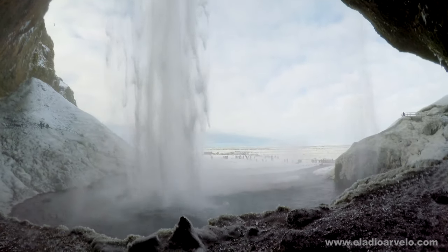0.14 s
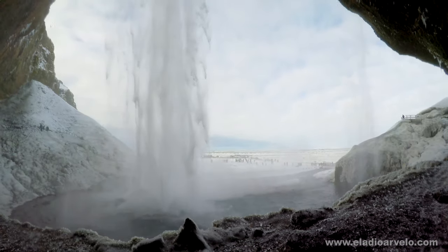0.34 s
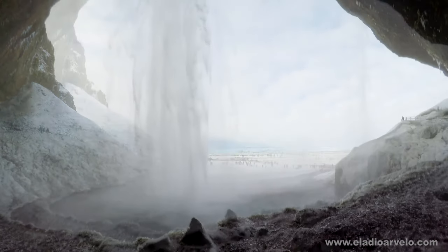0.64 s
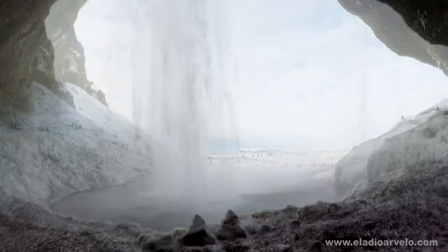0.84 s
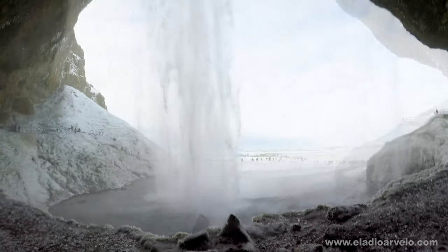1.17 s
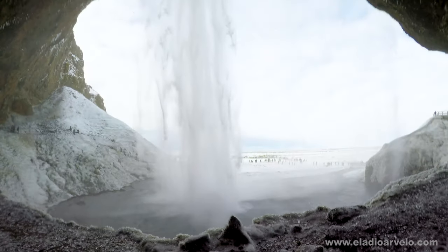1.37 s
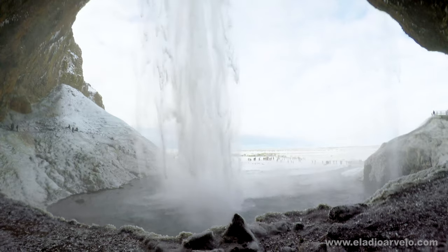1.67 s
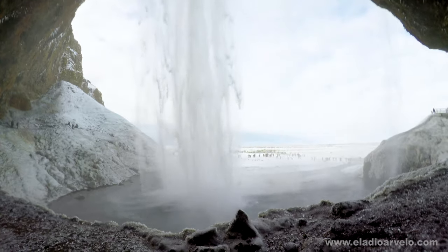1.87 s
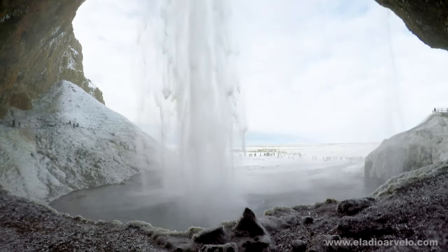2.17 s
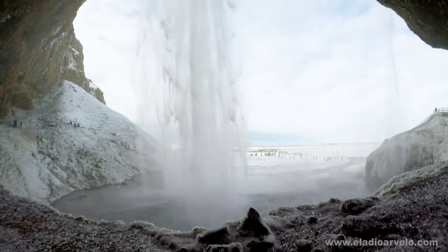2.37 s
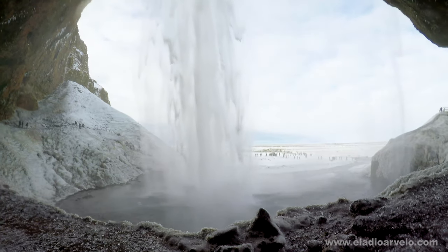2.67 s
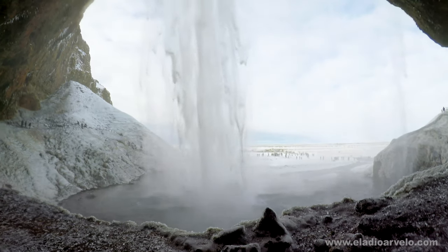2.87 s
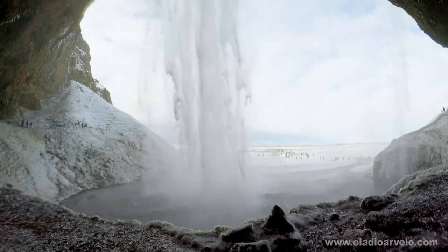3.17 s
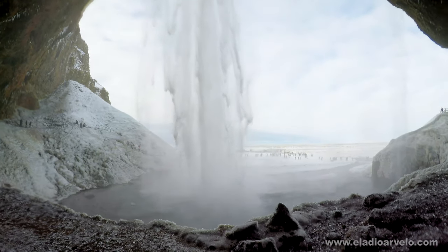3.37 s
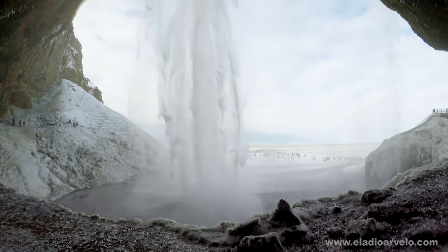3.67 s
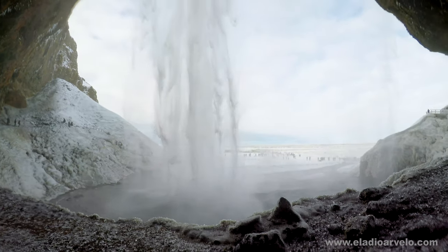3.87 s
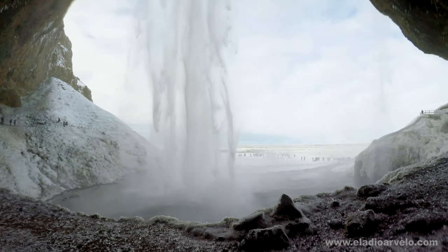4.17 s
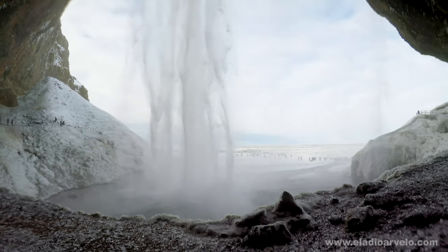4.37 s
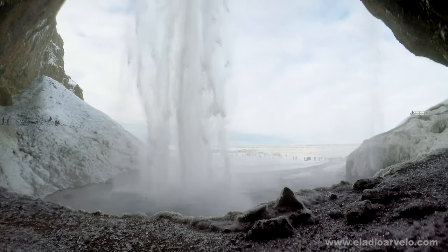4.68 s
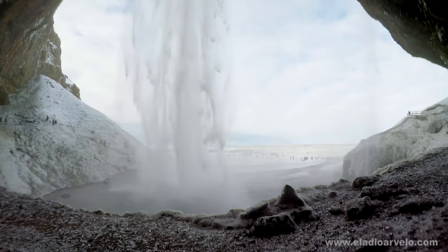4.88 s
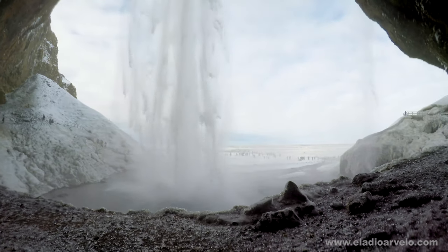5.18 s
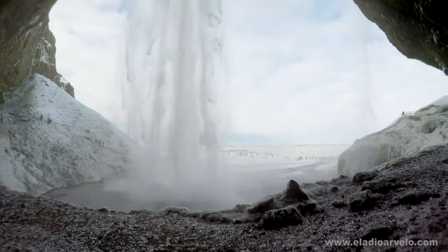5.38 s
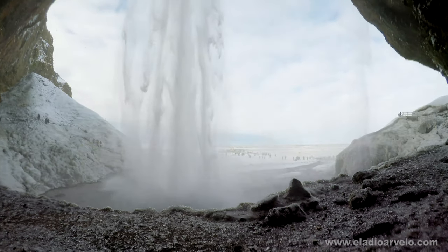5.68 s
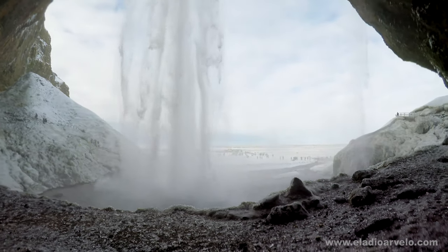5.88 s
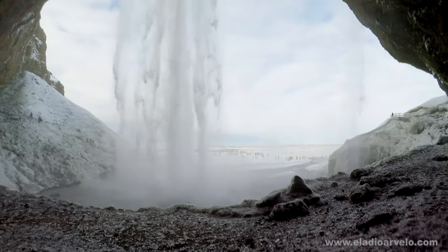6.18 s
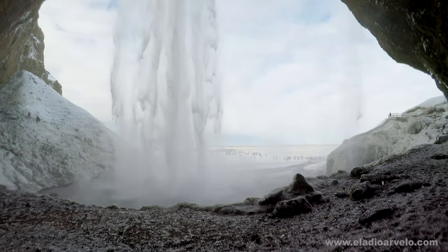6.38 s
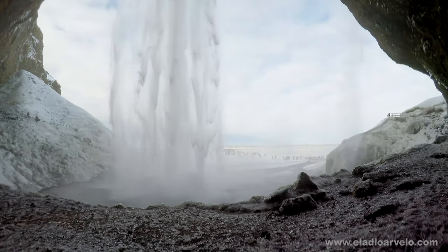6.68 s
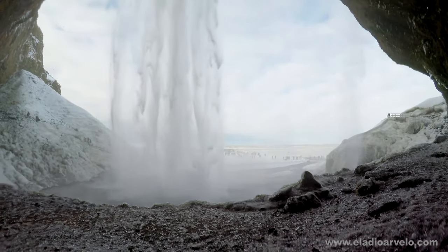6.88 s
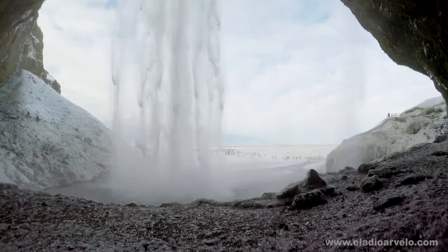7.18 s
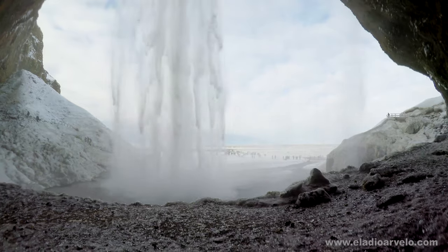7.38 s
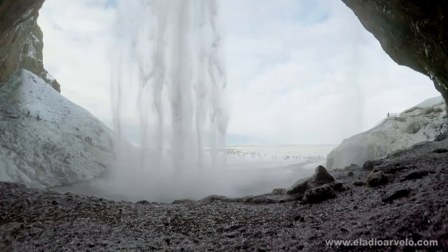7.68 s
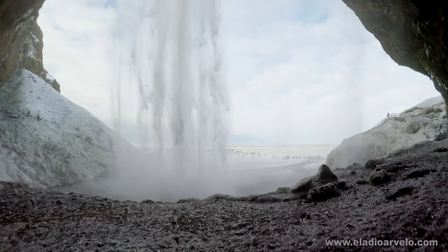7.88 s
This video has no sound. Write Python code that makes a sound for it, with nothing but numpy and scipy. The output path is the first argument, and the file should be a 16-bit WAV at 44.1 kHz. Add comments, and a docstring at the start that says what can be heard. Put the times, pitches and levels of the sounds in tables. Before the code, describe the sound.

Steady, powerful rush of falling water, already in full flow and cut off still running. Heavy bass rolls unevenly, with foamy low roar and muffled gurgling above it, little midrange, and a crisp wide hiss of drops and spray, slightly brighter at first. Short gulps and low booms thicken the rumble. Close single microphone inside a rocky hollow, with compressed bass.

```python
"""A tall waterfall plunges into a pool, heard for 8 s from the rock hollow behind it.
From the start, shaped noise gives the rumble, the hollow's resonant boom and the roar and gurgle of foam;
dense random impulses give the churn, splash, spray and mist, the spray brightest at first.
The rumble surges early, gulps of air follow, and a lump of water plops at about 0.9 s; louder booms
come from 2 s on. Throughout, the recorder holds the bass down with a fast compressor and cuts the top."""
import sys
import numpy as np
from scipy import signal
from scipy.fft import rfft, irfft
from scipy.io import wavfile
from scipy.ndimage import uniform_filter1d

SR = 44100
rng = np.random.default_rng(int(sys.argv[2]) if len(sys.argv) > 2 else 0)


def dump_mix(stems):
    """Bounce the given channels to the path in sys.argv[1] as a 16-bit WAV at rate SR."""
    frames = np.atleast_2d(stems).T  # one column per channel
    limited = np.clip(frames, -1, 1)  # hard clip at full scale
    pcm = np.round(limited * 32767).astype(np.int16)
    wavfile.write(sys.argv[1], SR, pcm)


N = 354563
TIME = np.arange(N) / SR
BINS_HZ = np.maximum(np.arange(N // 2 + 1) * SR / N, 1)   # kept above zero for the logarithm

# Level curves, before each source's gain and swells.
# weight of the falling column: [t/s, rumble level/dB]
COLUMN_WEIGHT = [(0, -15.5), (1.1, -16.5), (2.5, -16.5), (3.9, -17), (4.6, -15), (5.7, -20), (6.7, -16),
                 (8.04, -16.5)]
# how hard the hollow is driven: [t/s, boom level/dB]
HOLLOW_DRIVE = [(0.0, -23), (0.8, -19), (1.3, -27.5), (2.4, -18.5), (3.2, -22), (4.5, -26), (5.0, -23),
                (6.8, -22), (7.5, -17), (8.04, -19.5)]
# bubble clouds under the fall: [t/s, roar level/dB, gurgle level/dB, churn level/dB]
BUBBLE_CLOUDS = [(0.0, -24.0, -29.5, -40.5), (0.5, -21, -32.0, -43.5), (0.95, -21, -30.0, -41.5),
                 (1.8, -22, -30.5, -40.5), (2.5, -21, -31.5, -40.5), (4.0, -24.0, -32.5, -41.5),
                 (4.9, -22, -30.5, -42), (5.6, -23.5, -34.5, -43.0), (6.2, -24.5, -32.0, -43.5),
                 (6.7, -25, -31, -43.5), (7.7, -21, -30.5, -42.5), (8.04, -23, -32.5, -43.0)]
# how much water is thrown up from the pool: [t/s, level/dB]
THROWN_WATER = [(0.0, -26.5), (0.25, -26), (0.45, -29), (0.8, -27), (0.95, -26), (1.4, -27), (1.9, -27.5),
                (2.7, -26.5), (4.0, -27.5), (4.3, -26.5), (4.65, -26.5), (4.85, -28), (5.2, -27.5),
                (6.1, -28.0), (6.95, -27), (8.04, -28.5)]

# Spectral densities; only the shape counts, since each layer is scaled to rms 1.
# deep rumble of the plunge: [f/Hz, level/dB per Hz]
RUMBLE_SPECTRUM = [(4, -5.5), (9, -3.5), (17, -0.5), (33, -2), (43, 0), (55, 2), (72, -5), (90, -11),
                   (125, -25)]
# roar of big bubble clouds: [f/Hz, level/dB per Hz]
ROAR_SPECTRUM = [(70, -10), (105, -3.5), (140, 1.5), (172, -4.5), (215, -1), (238, -8), (265, -14),
                 (400, -57)]
# gurgle of smaller bubble clouds: [f/Hz, level/dB per Hz]
GURGLE_SPECTRUM = [(200, -20), (255, -0.5), (315, 1), (360, -6.5), (410, -6.5), (445, -13.5), (495, -14),
                   (545, -28.5), (700, -48)]
# churn of single bubbles: [f/Hz, level/dB per Hz]
CHURN_SPECTRUM = [(450, -17), (590, -15), (625, -4.5), (690, -3.5), (745, 1.5), (865, 0.5), (900, 0.5),
                  (965, -1.5), (1005, -7.5), (1065, -5.5), (1105, -18), (1300, -16)]
# drops splashing on the pool: [f/Hz, level/dB per Hz]
SPLASH_SPECTRUM = [(1000, -43), (1145, -16.5), (1190, -10.5), (1245, -8), (1300, -5), (1490, -1),
                   (1850, -3), (2250, -3), (3200, -5), (4200, -9.5), (7000, -17.5), (10000, -45)]
# hiss of blown spray: [f/Hz, level/dB per Hz]
SPRAY_SPECTRUM = [(1500, -31), (2900, -15), (3900, -0.5), (5200, -0.5), (6200, -1.6), (6900, -4),
                  (7700, -11), (8450, -11), (9150, -21.5), (10600, -40)]
# fizz of the finest mist: [f/Hz, level/dB per Hz]
MIST_SPECTRUM = [(7500, -17), (9400, 2), (10600, -1), (11500, -2), (12300, 1.5), (15100, -6)]

# Single events.
# heavier masses of water come down and the rumble surges: [t/s, rise in level/dB]
RUMBLE_SURGES = [(.36, 8.5), (1.76, 0), (3.3, 0), (4.39, 3), (4.76, 5), (5.25, 5), (7.9, 5)]
# big gulps of air go under and the foam swells: [t/s, rise in level/dB]
AIR_GULPS = [(.89, 4), (1.44, 0), (1.88, 5), (2.32, 5), (3.38, 3), (4.72, 5.5)]
# heavy lumps of water landing: [t/s, peak level/dB]
WATER_LUMPS = [(0.905, -22.5)]
# the hollow swells into a louder boom: [t/s, rise in level/dB]
HOLLOW_BOOMS = [(2.06, 11.5), (6.4, 9), (7.01, 10)]

# half-length of a swell, from its peak to 1/e of its rise in dB
SURGE_HALF_S, GULP_HALF_S, BOOM_HALF_S = 0.08, 0.028, 0.043
HOLLOW_HZ, HOLLOW_HALF_WIDTH_HZ = 89.1, 8
CHURN_SHARE = 0.33   # share of a gulp's rise in dB that reaches the churn
SPRAY_EXTRA_DB, SPRAY_SETTLE_S = 2.5, 1.5   # initial excess of spray and its time constant
CUTOFF_HZ = 15250


def from_db(db):
    """Logarithmic level: 20 dB is a tenfold amplitude."""
    return 10 ** (np.asarray(db) / 20)


def rms_one(x):
    """Normalization: scale a signal to rms 1."""
    return x / np.sqrt(np.mean(x ** 2) + 1e-20)


def in_time(rows):
    """Linear interpolation: each column of a curve, sample by sample."""
    s, *columns = np.transpose(rows)
    return [np.interp(TIME, s, column) for column in columns]


def coloured(x, spectrum):
    """Spectral shaping: a flat excitation is filtered to a spectrum, then scaled to rms 1."""
    hz, db = np.transpose(spectrum)
    # straight lines over log frequency; the level below the first point is held
    level_db = np.interp(np.log(BINS_HZ), np.log(hz), db, right=-120)
    return rms_one(irfft(rfft(x) * from_db(level_db), N))


def drift(rate_hz):
    """Random fluctuation: low-passed noise of rms 1."""
    lowpass = 1 / (1 + (BINS_HZ / rate_hz) ** 2)
    return rms_one(irfft(rfft(rng.standard_normal(N)) * lowpass, N))


def power(x, span_s):
    """Short-time power: the squared signal averaged under a triangular window."""
    size = max(int(span_s * SR), 2)
    once = uniform_filter1d(x ** 2, size)
    return np.maximum(uniform_filter1d(once, size), 1e-12)


def steady(x, span_s):
    """Envelope normalization: an even flow is noise with its slow swells levelled out."""
    return x / np.sqrt(power(x, span_s))


def impacts(per_s, spread_db):
    """Poisson-like arrivals: drops of uneven size land at random, so densely that they merge."""
    landed = rng.random(N) < per_s / SR
    size = from_db(spread_db * rng.standard_normal(N))
    return landed * rng.standard_normal(N) * size


def swells(rows, half_s):
    """Gaussian envelope: each event lifts the level by a bell-shaped swell, in dB."""
    return sum(rise_db * np.exp(-((TIME - s) / half_s) ** 2) for s, rise_db in rows)


def plunge(gain_db, roll_db, roll_hz):
    """Turbulent noise: the column's weight heaves the pool, a deep rumble that rolls and surges."""
    weight_db, = in_time(COLUMN_WEIGHT)
    roll = roll_db * drift(roll_hz)
    surge_db = swells(RUMBLE_SURGES, SURGE_HALF_S)
    rumble = steady(coloured(rng.standard_normal(N), RUMBLE_SPECTRUM), span_s=0.18)
    return from_db(weight_db + gain_db + roll + surge_db) * rumble


def hollow(gain_db):
    """Cavity resonance: turbulence keeps one low resonance of the rock hollow booming."""
    drive_db, = in_time(HOLLOW_DRIVE)
    edges = [HOLLOW_HZ - HOLLOW_HALF_WIDTH_HZ, HOLLOW_HZ + HOLLOW_HALF_WIDTH_HZ]
    band = signal.butter(2, edges, "band", fs=SR, output="sos")
    boom = signal.sosfilt(band, rng.standard_normal(N + SR))[SR:]   # one second to build up
    rise_db = swells(HOLLOW_BOOMS, BOOM_HALF_S)
    return from_db(drive_db + rise_db + gain_db) * steady(boom, span_s=0.13)


def foam(roar_gain_db, gurgle_gain_db, churn_gain_db):
    """Bubble radiation: submerged air roars in big clouds, gurgles in smaller ones, churns singly."""
    roar_db, gurgle_db, churn_db = in_time(BUBBLE_CLOUDS)
    gulp_db = swells(AIR_GULPS, GULP_HALF_S)
    roar = steady(coloured(rng.standard_normal(N), ROAR_SPECTRUM), span_s=0.3)
    gurgle = steady(coloured(rng.standard_normal(N), GURGLE_SPECTRUM), span_s=0.5)
    churn = steady(coloured(impacts(per_s=9000, spread_db=1.5), CHURN_SPECTRUM), span_s=0.54)
    return (from_db(roar_db + roar_gain_db + gulp_db) * roar
            + from_db(gurgle_db + gurgle_gain_db + gulp_db) * gurgle
            + from_db(churn_db + churn_gain_db + CHURN_SHARE * gulp_db) * churn)


def surface(splash_gain_db, spray_gain_db, mist_gain_db, flicker_db):
    """Superposed impacts: drops splash, blown spray hisses and flickers, the finest mist fizzes on top."""
    thrown_db, = in_time(THROWN_WATER)
    splash = steady(coloured(impacts(per_s=32000, spread_db=0.6), SPLASH_SPECTRUM), span_s=0.31)
    spray = steady(coloured(impacts(per_s=30000, spread_db=1.0), SPRAY_SPECTRUM), span_s=0.13)
    mist = coloured(impacts(per_s=30000, spread_db=2.0), MIST_SPECTRUM)
    settling_db = SPRAY_EXTRA_DB * np.exp(-TIME / SPRAY_SETTLE_S)
    spray_db = spray_gain_db + settling_db + flicker_db * drift(rate_hz=14)
    drops = from_db(splash_gain_db) * splash + from_db(spray_db) * spray + from_db(mist_gain_db) * mist
    return from_db(thrown_db) * drops


def lumps(decay_s, low_hz, high_hz):
    """Impact transient: a landing lump of water is a decaying noise burst, band-passed to a dull plop."""
    out = np.zeros(N)
    band = signal.butter(3, [low_hz, high_hz], "band", fs=SR, output="sos")
    for s, peak_db in WATER_LUMPS:
        age = TIME - s
        decay = np.exp(-np.minimum(np.abs(age) / decay_s, 20))
        burst = rng.standard_normal(N) * (age > 0) * decay
        plop = signal.sosfilt(band, burst)
        out += from_db(peak_db) * plop / np.abs(plop).max()
    return out


def scene():
    """Linear superposition: the fall, its hollow and the pool add up at one microphone."""
    bass = plunge(gain_db=0.6, roll_db=1.04, roll_hz=6.8) + hollow(gain_db=0.4)
    bubbles = foam(roar_gain_db=0.5, gurgle_gain_db=-0.15, churn_gain_db=0.5)
    drops = surface(splash_gain_db=-2.5, spray_gain_db=-4.0, mist_gain_db=-25.5, flicker_db=0.35)
    plops = lumps(decay_s=0.0077, low_hz=380, high_hz=880)
    return (bass + bubbles + drops + plops)[None]


def bass_compressor(x, split_hz, threshold_db, span_s):
    """Dynamic compression: bass above the threshold is turned down; the treble passes untouched."""
    bass = irfft(rfft(x) / (1 + (BINS_HZ / split_hz) ** 8), N)
    over = power(bass, span_s) / from_db(threshold_db) ** 2   # power relative to the threshold
    held_bass = bass / (1 + over ** 4) ** (1 / 8)   # soft knee; far above it the level is held
    return x - bass + held_bass


def record(dry):
    """Band limiting: the bass is compressed, then a very steep low-pass cuts the top."""
    held = bass_compressor(dry[0], split_hz=650, threshold_db=-11.5, span_s=0.019)
    lowpass = 1 / np.sqrt(1 + (BINS_HZ / CUTOFF_HZ) ** 400)
    return irfft(rfft(held) * lowpass, N)[None]


dry = scene()
out = record(dry)
dump_mix(out)
```